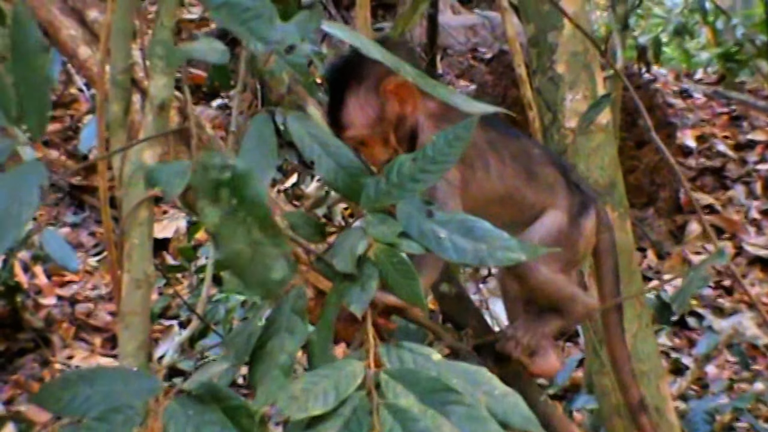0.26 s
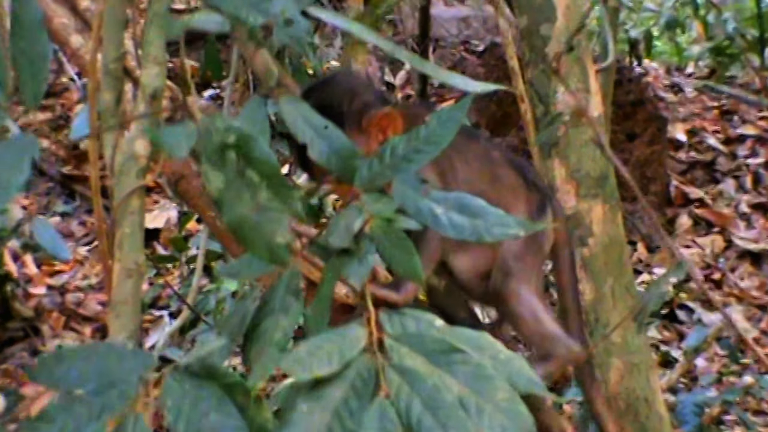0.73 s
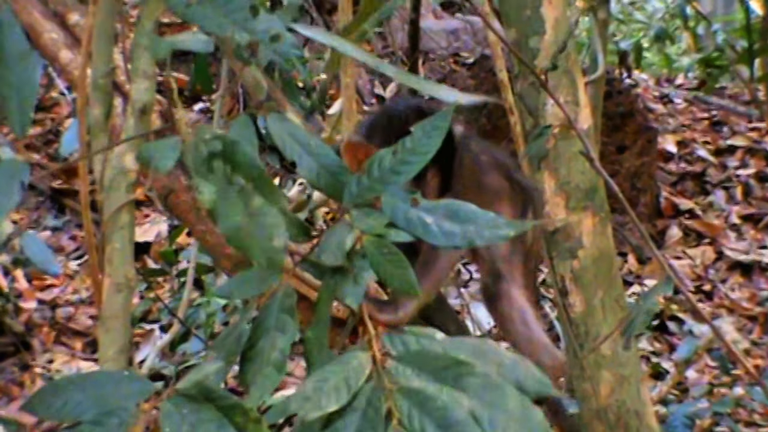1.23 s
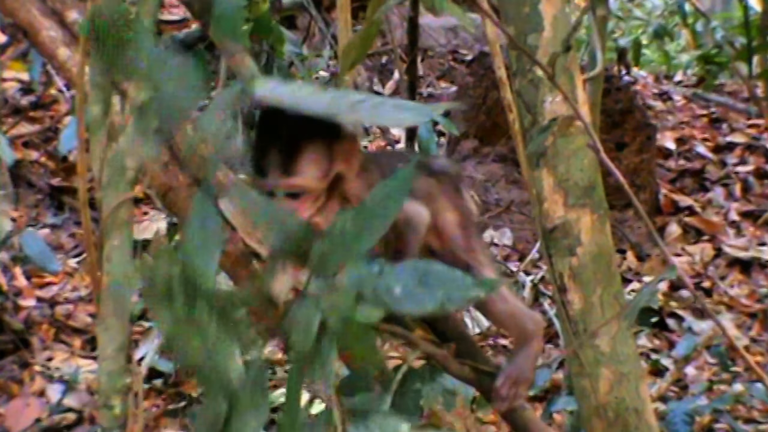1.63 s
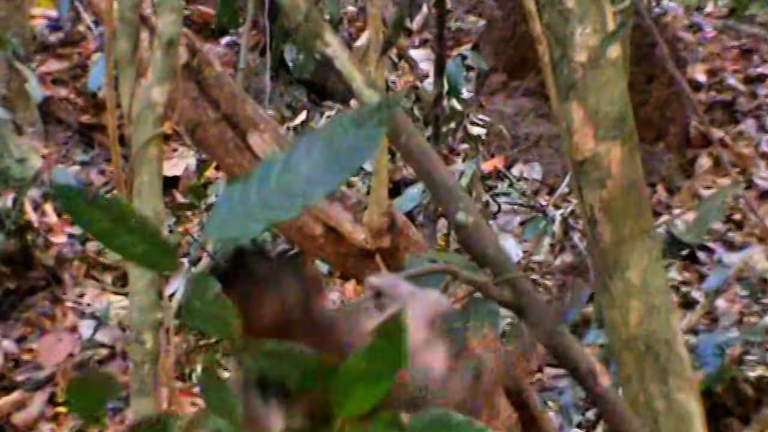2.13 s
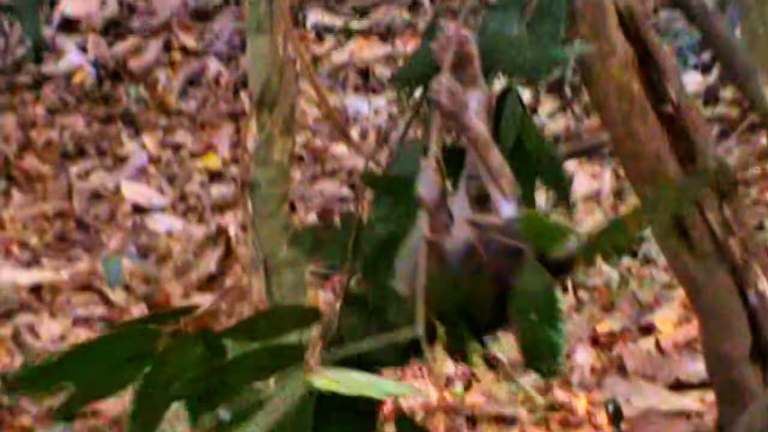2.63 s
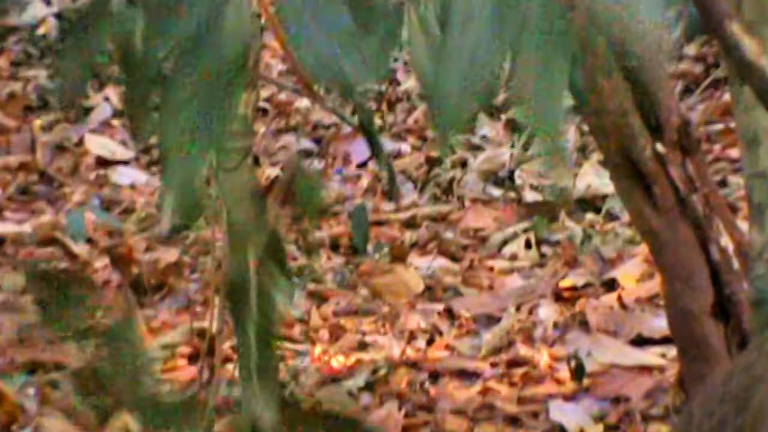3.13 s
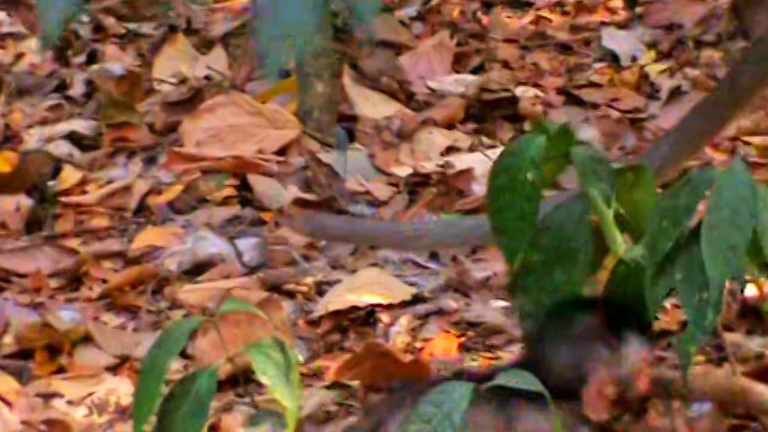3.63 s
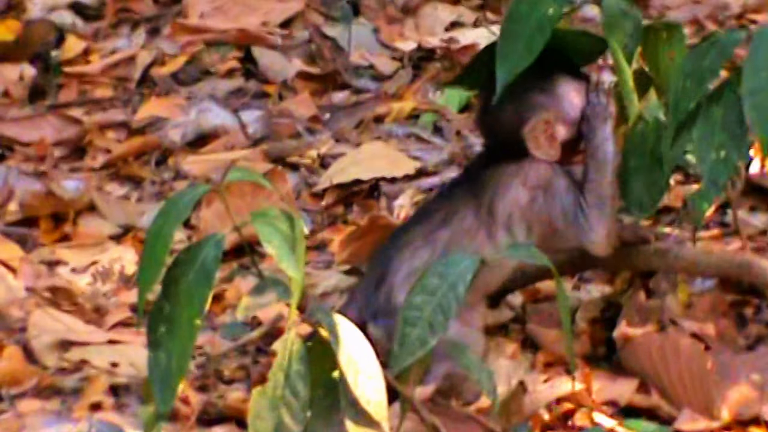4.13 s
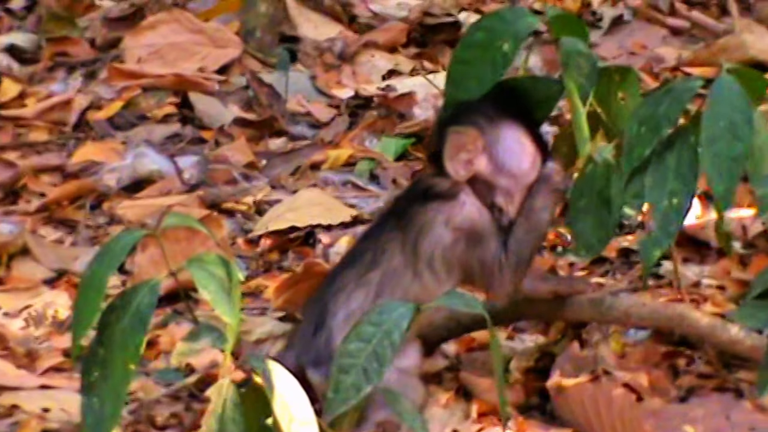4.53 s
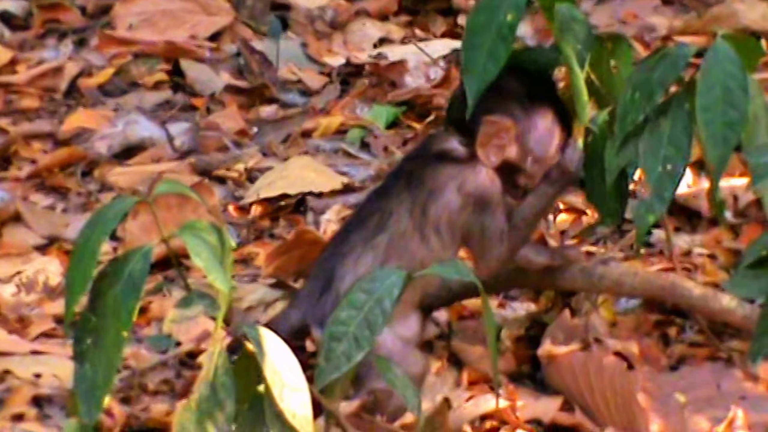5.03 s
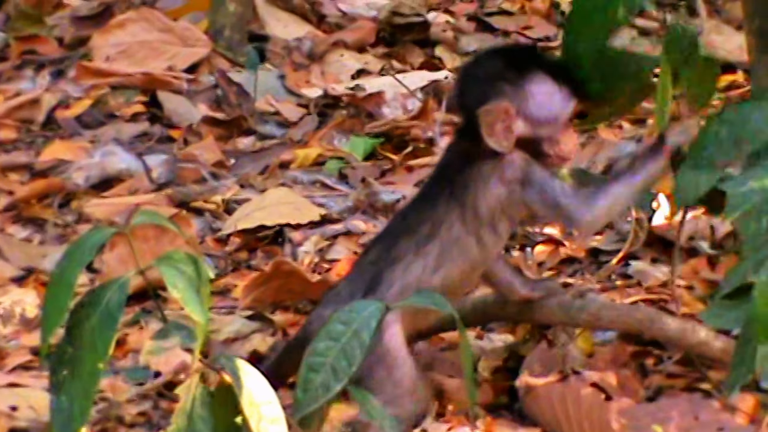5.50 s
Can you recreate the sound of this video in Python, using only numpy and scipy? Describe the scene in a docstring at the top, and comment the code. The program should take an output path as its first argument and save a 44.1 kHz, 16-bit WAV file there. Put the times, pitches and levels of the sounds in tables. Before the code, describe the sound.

Loud, steady insect song dominates from start to end: a dense ringing mass in the middle and treble, with a high buzz that swells and fades six to nine times a second in uneven runs. Small woody taps and soft leaf crackle from a moving monkey come through quietly, clearest near 4.8 seconds. Outdoor forest, close wide microphones, faint low rumble.

```python
"""A tropical forest floor, heard at two close microphone ports over a faint rumble, hum and hiss.
From start to end a dense cicada chorus sings: countless tymbal clicks ring in a ladder of body resonances.
A thin, evenly pulsing buzz goes on with it; from the first moment a nearer insect throbs in the treble,
in runs of about six to nine throbs a second. A small monkey knocks twigs and leaves early on, near 1.6 s
and 3.2 s, and more often after 4.2 s: short ringing tones with puffs of crackle, and a few longer rustles."""
import sys
import numpy as np
from scipy import signal
from scipy.fft import rfft, irfft
from scipy.io import wavfile

SR = 44100
rng = np.random.default_rng(int(sys.argv[2]) if len(sys.argv) > 2 else 0)


def unload_wav(signal):
    """Save mono or channel-first audio to the path in sys.argv[1] as 16-bit WAV at rate SR, clipped to [-1, 1]."""
    wavfile.write(
        sys.argv[1],
        SR,
        np.round(np.clip(np.atleast_2d(signal).T, -1, 1) * 32767).astype(np.int16),
    )


N = 254016
TIME = np.arange(N) / SR
HZ = np.maximum(np.arange(N // 2 + 1) * SR / N, 1)  # frequency bins, kept above zero for the logarithm
CLICKS_PER_S = 30000  # clicks of the chorus crowd and of the thin singer

# twigs and leaves knocked: t/s, peak level before panning/dB, pitch f/Hz, ring until 60 dB down/cycles
KNOCKS = [(.12, -42, 400, 3.1), (.29, -50, 1000, 8), (1.646, -42, 950, 8), (1.65, -45, 380, 5),
          (3.223, -43, 480, 5), (3.242, -43, 780, 10), (4.225, -45, 1000, 7), (4.774, -41, 950, 11),
          (4.789, -35, 1060, 16), (5.166, -46, 525, 8), (5.207, -39, 700, 7), (5.299, -50, 458, 8.7),
          (5.659, -46, 496, 13)]


def from_db(db):
    """Turn decibels into a gain."""
    return 10 ** (np.asarray(db) / 20)


def rms_one(x):
    """Scale to an rms (average strength) of 1."""
    return x / np.sqrt(np.mean(x ** 2) + 1e-20)


def over_hz(points, column=1):
    """Read a table column at every frequency bin, with straight lines on a log frequency axis."""
    points = np.array(points)
    return np.interp(np.log(HZ), np.log(points[:, 0]), points[:, column])


def colour(x, spectrum):
    """Filter a sound by a table of frequency in Hz and level in dB."""
    return irfft(rfft(x) * from_db(over_hz(spectrum)), N)


def resonate(x, hz, width_hz):
    """Ring like one body: a two-pole resonance whose gain at the top is 1."""
    r = np.exp(-np.pi * width_hz / SR)
    feed = np.array([1, 0, -1]) * (1 - r * r) / 2
    feedback = [1, -2 * r * np.cos(2 * np.pi * hz / SR), r * r]
    return signal.lfilter(feed, feedback, x)


def resonate_twice(x, hz, width_hz):
    """Two equal resonances in a row, so the flanks fall twice as fast in dB."""
    return resonate(resonate(x, hz, width_hz), hz, width_hz)


def drift(rate_hz):
    """Wander slowly by chance with rms 1: coarse noise through two equal one-pole low-passes."""
    step = 40  # samples between coarse points
    r = np.exp(-2 * np.pi * rate_hz * step / SR)
    noise = rng.standard_normal(N // step + 2002)
    slow = signal.lfilter([1], [1, -2 * r, r * r], noise)[2000:]  # skip the filter's start
    return np.interp(np.arange(N) / step, np.arange(len(slow)), rms_one(slow))


def random_clicks(per_s):
    """Two unrelated crowds of clicks at chance times and of uneven size, with rms 1."""
    size = rng.standard_normal((2, N))
    happens = rng.random((2, N)) < per_s / SR
    return rms_one(size * happens)


def bumps(rows):
    """Level curve of smooth swells (time s, spread s, level dB), added in power."""
    power = sum(from_db(2 * db) * np.exp(-((TIME - s) / spread) ** 2) for s, spread, db in rows)
    return np.sqrt(power)


def forest_floor(patchy_db):
    """Coloured noise makes rumble and hiss that come and go; resonated noise makes a wavering low hum."""
    # balance of rumble and hiss: f/Hz, relative level/dB
    floor_spectrum = [(15, -39), (25, -6), (98, -3), (174, -3), (207, -3.5), (232, -2.5), (314, -3.5),
                      (346, -7), (484, -4), (606, -5.5), (1150, -6), (1500, -35), (2530, -120)]
    floor_db = -57.5  # before the patchy wandering
    hum_hz, hum_width_hz, hum_db = 103.6, 8.6, -69.5
    noise = rms_one(colour(rng.standard_normal((2, N)), floor_spectrum))
    wander_db = patchy_db * (drift(7) + drift(0.42))
    hum = rms_one(resonate(rng.standard_normal((2, N)), hum_hz, hum_width_hz))
    return from_db(floor_db + wander_db) * noise + from_db(hum_db) * hum


def rustles():
    """Leaf crackle is chance clicks in broad resonances, in short swells and in a puff at every knock."""
    # leaves brushed: t/s, spread/s, level/dB, pitch f/Hz
    brushes = [(.05, .04, -54, 149), (3.15, .04, -54.5, 650), (3.22, 0.078, -55.5, 500),
               (4.90, 0.025, -49, 700), (5.22, 0.077, -57, 600)]
    relative_width = 1.5  # resonance width as a share of the pitch
    puff_spread_s, puff_db, puff_hz = .012, -19, 450  # puff level is relative to its knock
    crackle = random_clicks(600)

    def leaves(hz):
        """Ring the crackle at one pitch."""
        return rms_one(resonate_twice(crackle, hz, relative_width * hz))

    # every knock shakes a short puff of crackle loose
    puff_level = bumps([(s, puff_spread_s, db + puff_db) for s, db, *_ in KNOCKS])
    puffs = puff_level * leaves(puff_hz)
    return puffs + sum(bumps([(s, spread, db)]) * leaves(hz) for s, spread, db, hz in brushes)


def knocks():
    """Each knock is a soft contact, a tone that rises gently and rings for a few cycles."""
    rise_cycles = 1.1  # time constant of the soft start
    pan_db = -1.5  # left compared with right
    out, t = np.zeros(N), TIME[:2000]
    for s, db, hz, cycles in KNOCKS:
        onset = 1 - np.exp(-t * hz / rise_cycles)
        decay = from_db(-60 * t * hz / cycles)
        ring = onset * np.sin(2 * np.pi * hz * t) * decay
        at = round(s * SR)
        out[at:at + len(t)] += ring / np.abs(ring).max() * from_db(db)
    return out * from_db([[pan_db / 2], [-pan_db / 2]])


def thin_singer():
    """Clicks in one narrow resonance make a whistle-like buzz with an even pulse."""
    hz, width_hz, level_db = 8030, 320, -33  # level before the pulse
    pulses_per_s, first_crest_s, depth = 8.8, 0.091, 0.43
    buzz = rms_one(resonate_twice(random_clicks(CLICKS_PER_S), hz, width_hz))
    pulse = 1 + depth * np.cos(2 * np.pi * pulses_per_s * (TIME - first_crest_s))
    return from_db(level_db) * pulse * buzz


def throb_envelope():
    """Level curve of the near insect: runs of smooth swells, each crest a little uneven by chance."""
    # even runs of throbs: first crest t/s, number of throbs, time between crests/s,
    # level of the first before unevenness/dB, level change per throb/dB
    runs = [(.012, 6, .138, -26.5, .3), (.84, 7, .132, -27.5, -.1), (1.8, 2, .168, -31, 3),
            (2.147, 2, .108, -25.5, 1), (2.37, 3, .169, -22.5, -3), (2.872, 9, .1635, -22.8, 0),
            (4.333, 6, .152, -24.5, .1), (5.235, 4, .142, -25, -.3)]
    spread_s, uneven_db = .028, .6
    crests = []
    for s, count, gap, db, step_db in runs:
        crests += [(s + k * gap, db + k * step_db) for k in range(count)]
    own_db = rng.normal(0, uneven_db, len(crests))
    return bumps([(s, spread_s, db + extra_db) for (s, db), extra_db in zip(crests, own_db)])


def throbber(throb):
    """A treble buzz of coloured clicks that swells and fades with each pump of the abdomen."""
    # colour of the buzz, a band and its octave: f/Hz, relative level/dB
    throb_colour = [(4500, -80), (6000, -30), (6500, -7), (6900, -3), (7500, -3), (8050, -5), (8700, -3),
                    (9700, -19), (10500, -15.5), (11300, -20), (12000, -16), (13000, -19.5), (14000, -20),
                    (16000, -22.5)]
    return throb * rms_one(colour(random_clicks(12000), throb_colour))


def chorus(throb, flutter_db):
    """Each body resonance is rung by its own crowd of tymbal clicks and flutters on its own."""
    # body resonances: f/Hz, width of each of two passes/Hz, relative level/dB,
    # voice (0 low, 1 middle, 2 upper)
    modes = [(1543, 344, -17, 0), (1772.5, 212, -6, 0), (1957, 500, -18, 0), (3300, 470, -7, 1),
             (3488, 483, -1.5, 1), (3815, 440, -8, 1), (4330, 440, -10, 1), (5138, 540, -5, 1),
             (5634, 550, -11.5, 1), (6110, 370, -15, 2), (6790, 430, -11, 2)]
    # broad rasp between and above the resonances: f/Hz, relative level/dB
    rasp = [(1200, -48), (2400, -24), (3000, -19.5), (4600, -14.5), (6200, -14.5), (7600, -12.5),
            (8600, -14.5), (10000, -19), (11600, -23), (12600, -30.5), (13150, -25.5), (14000, -35),
            (16000, -32)]
    # swell of the chorus: t/s, change of the low voice/dB, of the middle/dB, of the upper/dB
    swell = [(0, 0.4, -.2, 0.38), (1.8, 0.6, .2, 0.08), (3.4, -0.06, 0.17, -.4), (5.76, -0.3, -0.84, 0.65)]
    chorus_db, radiates_above_hz = -16.5, 1327
    s, *voices_db = np.transpose(swell)
    low_db, middle_db, upper_db = [np.interp(TIME, s, db) for db in voices_db]
    # the low and middle voices thin out at the crest of a strong throb, by at most 1.5 dB
    dip_db = -1.5 * throb / throb.max()
    swell_db = (low_db + dip_db, middle_db + dip_db, upper_db)
    song = from_db(upper_db) * colour(random_clicks(CLICKS_PER_S), rasp)
    for hz, width_hz, db, voice in modes:
        # tymbal and air sac are tuned alike, hence two equal resonances
        rung = resonate_twice(random_clicks(CLICKS_PER_S), hz, width_hz)
        level_db = db + swell_db[round(voice)] + flutter_db * drift(14.0)
        song = song + from_db(level_db) * rung
    # small bodies radiate almost nothing below their lowest resonance
    high_pass = signal.butter(6, radiates_above_hz, "high", fs=SR, output="sos")
    return from_db(chorus_db) * rms_one(signal.sosfilt(high_pass, song))


def ports(field):
    """Left and right share one sound field, shifted in phase, and differ by a second, unrelated one."""
    # the two ports: f/Hz, likeness (0-1), phase by which left leads/radians, left minus right level/dB
    port_table = [(40, .992, 0, 0), (100, 1, 0, -.3), (200, 0.82, -0.42, -0.5), (350, 0, 0.13, -1),
                  (750, 0.2, -0.69, -.5), (1200, 1, -0.65, -0.5), (1800, 0.86, -0.18, 0),
                  (3980, 0.86, -0.33, -0.3), (6500, .89, 0.093, -0.3), (9400, 1, 0.3, -.5),
                  (11050, 0.5, 0.58, 0), (12400, 0.5, 1.2, 4), (13500, .55, 1.3, 0), (14900, .7, .2, 4),
                  (15400, .97, 0, -3)]
    shared, own = rfft(field)
    alike = np.clip(over_hz(port_table), 0, 1)
    lead = over_hz(port_table, column=2)
    balance_db = over_hz(port_table, column=3)
    sides = np.array([[1], [-1]])  # left, right
    mixed = np.sqrt((1 + alike) / 2) * shared + sides * np.sqrt((1 - alike) / 2) * own
    shift = np.exp(.5j * sides * lead)
    return irfft(mixed * shift * from_db(sides * balance_db / 2), N)


def scene():
    """Insects, floor and leaves go through the ports; the knocks are added in front."""
    throb = throb_envelope()
    insects = chorus(throb, flutter_db=.5) + throbber(throb) + thin_singer()
    return ports(insects + forest_floor(patchy_db=0.6) + rustles()) + knocks()


def record(dry):
    """Roll off the deep bass gently and cut the top steeply."""
    bass_cut_hz, top_cut_hz = 25, 15710
    high_pass = signal.butter(2, bass_cut_hz, "high", fs=SR, output="sos")
    low_pass = signal.ellip(12, .3, 70, top_cut_hz, fs=SR, output="sos")  # .3 dB ripple, 70 dB stop
    return signal.sosfilt(low_pass, signal.sosfilt(high_pass, dry))


dry = scene()
out = record(dry)
unload_wav(out)
```